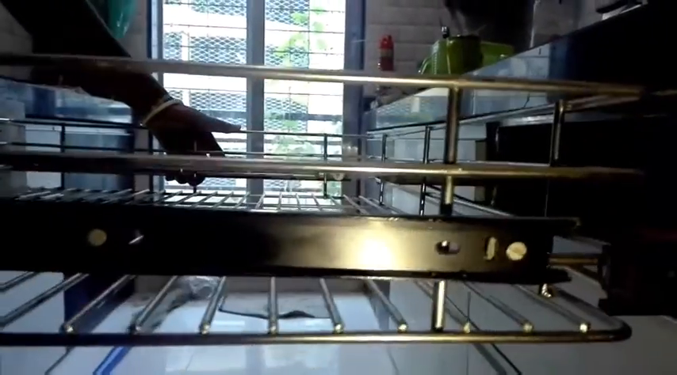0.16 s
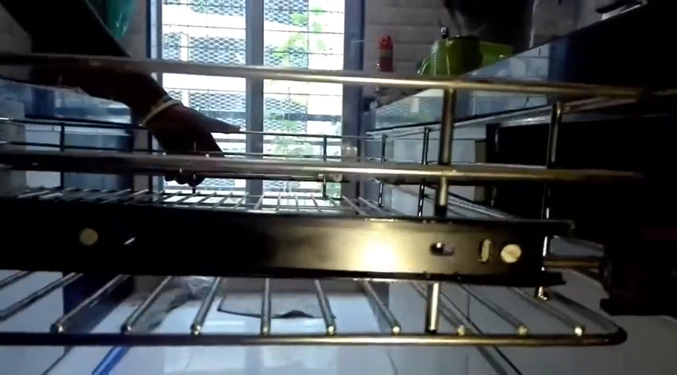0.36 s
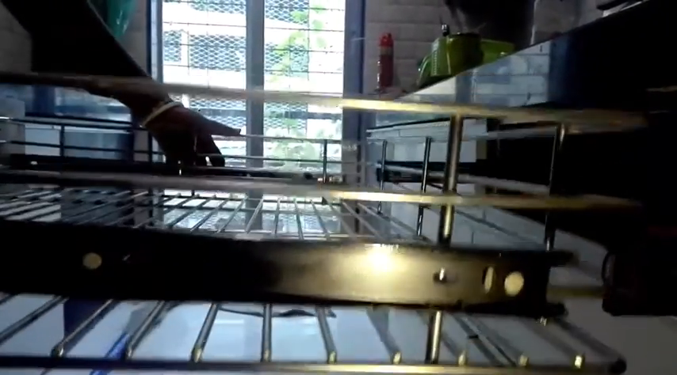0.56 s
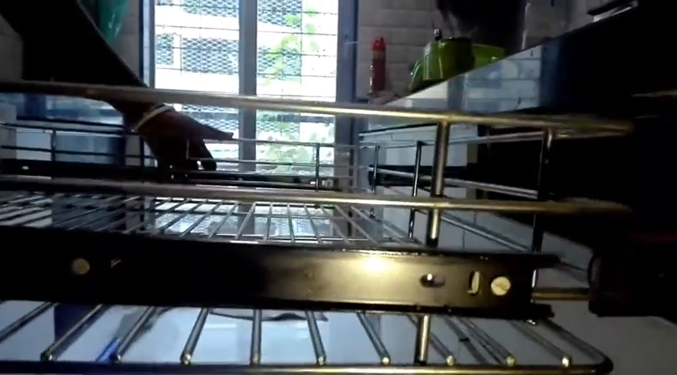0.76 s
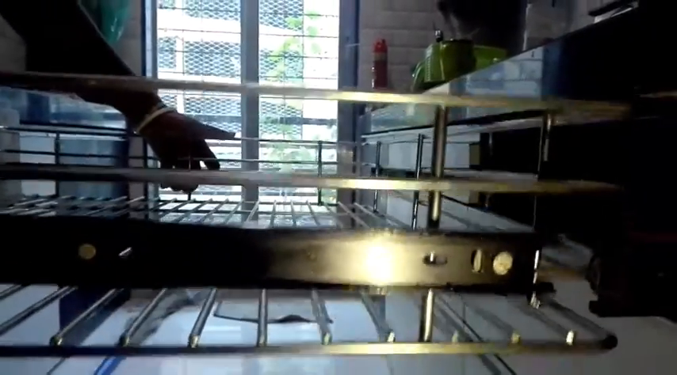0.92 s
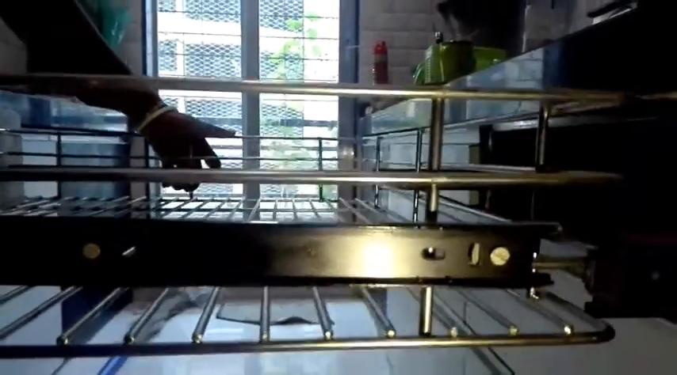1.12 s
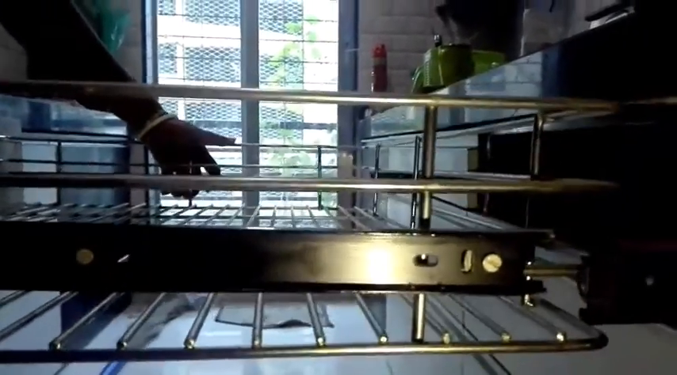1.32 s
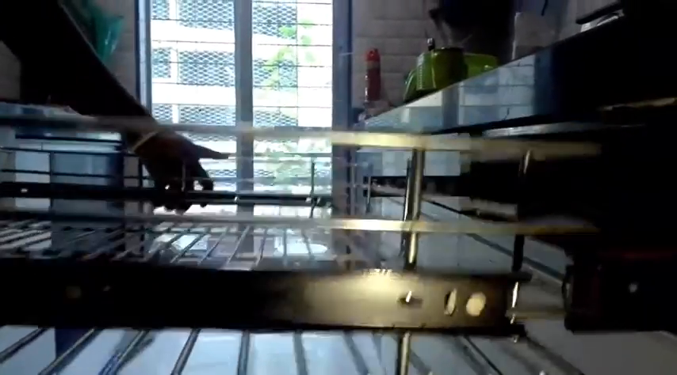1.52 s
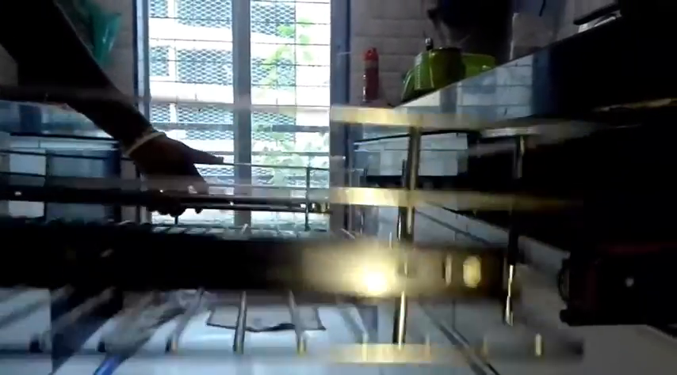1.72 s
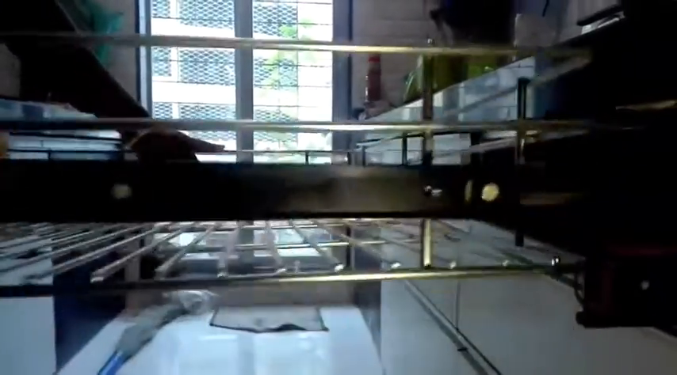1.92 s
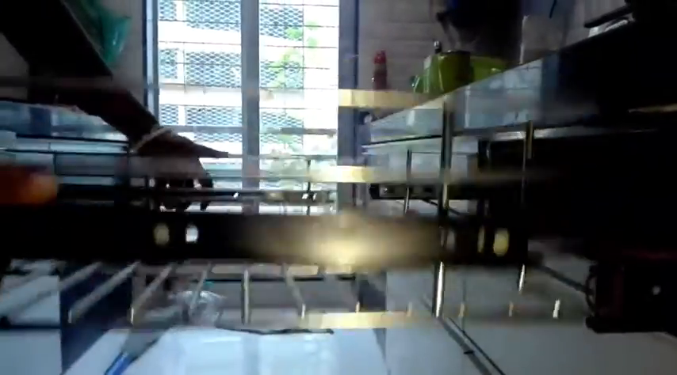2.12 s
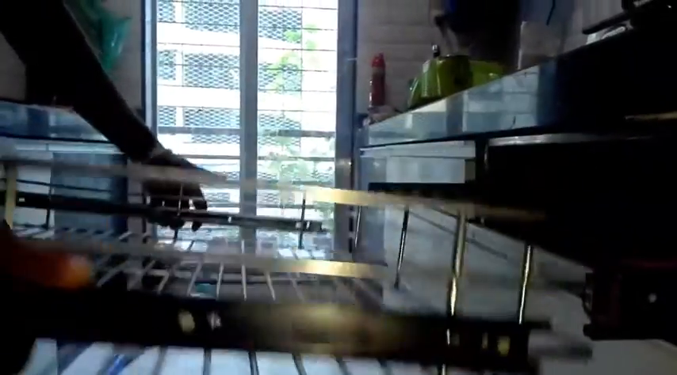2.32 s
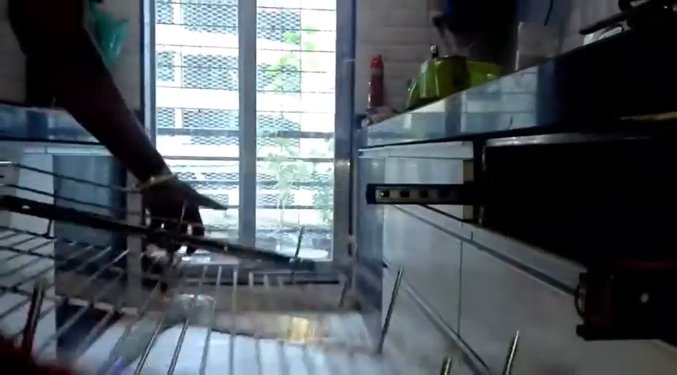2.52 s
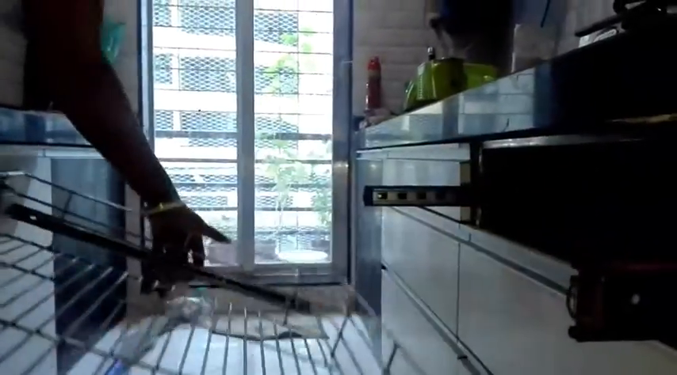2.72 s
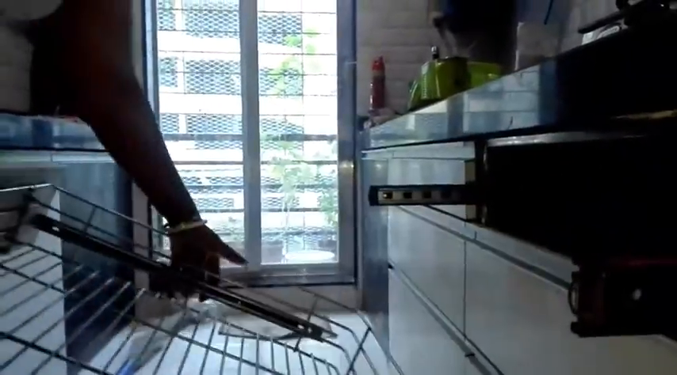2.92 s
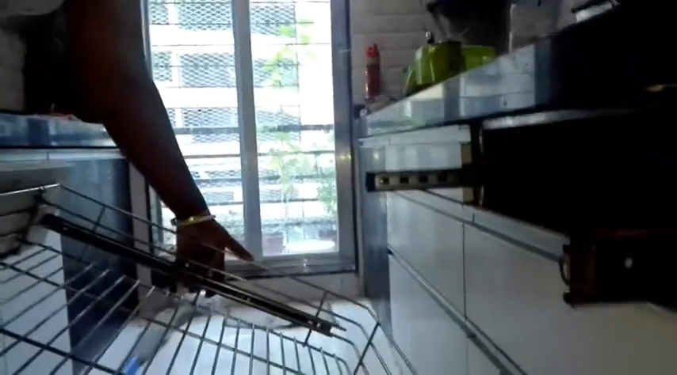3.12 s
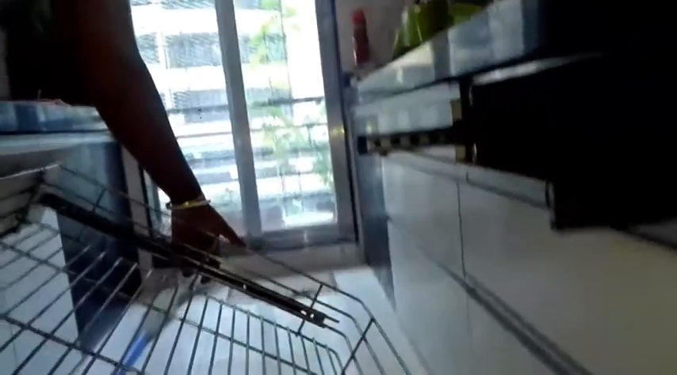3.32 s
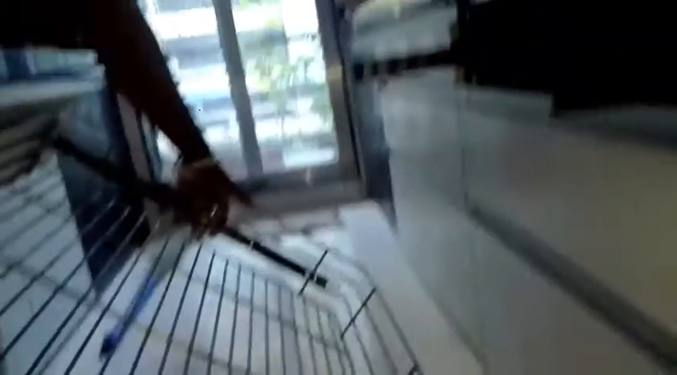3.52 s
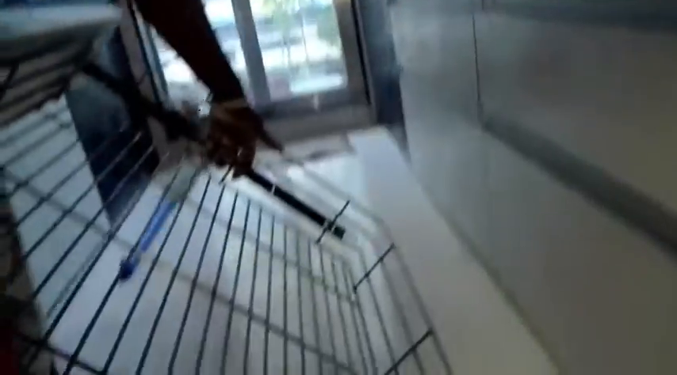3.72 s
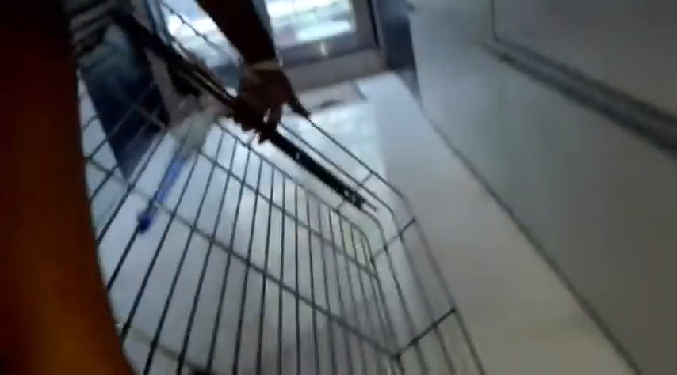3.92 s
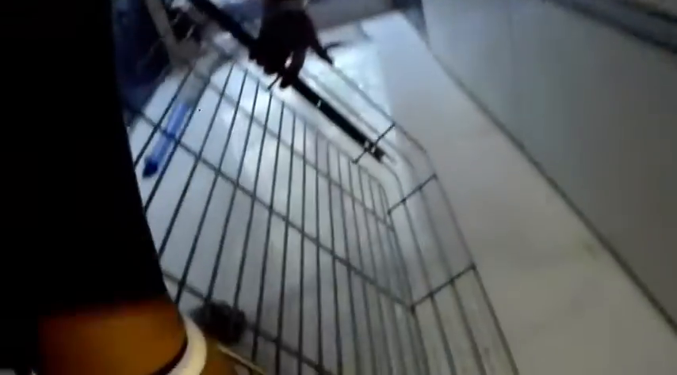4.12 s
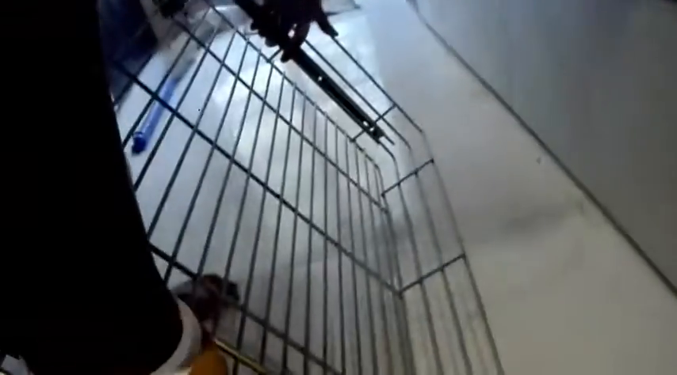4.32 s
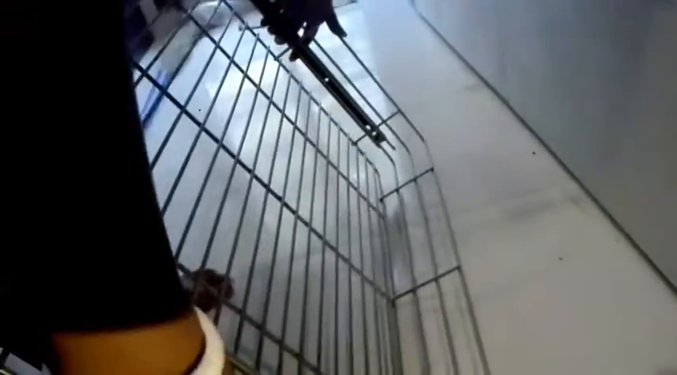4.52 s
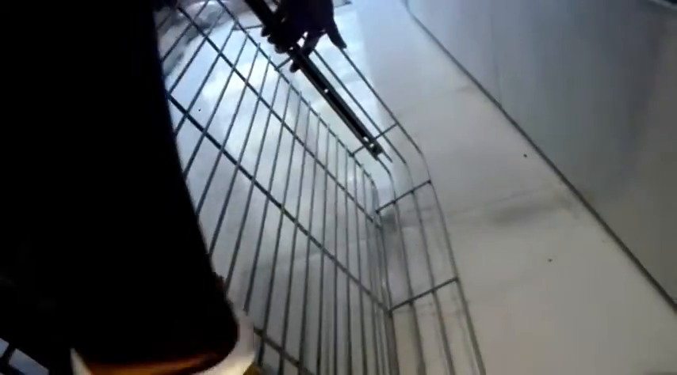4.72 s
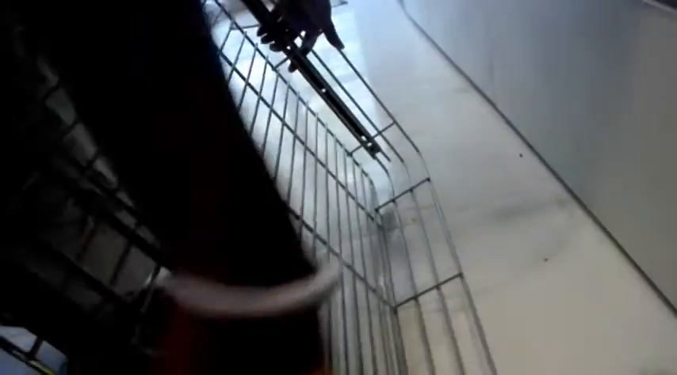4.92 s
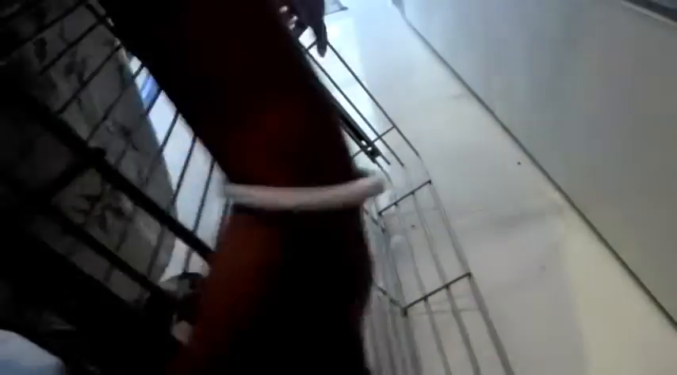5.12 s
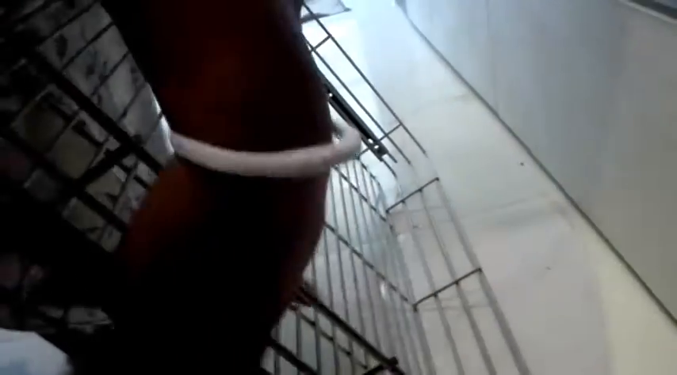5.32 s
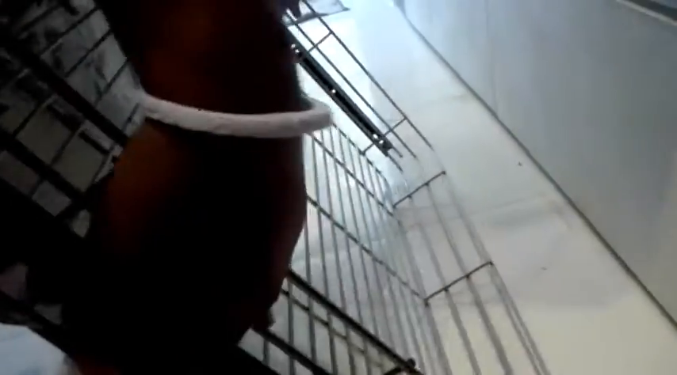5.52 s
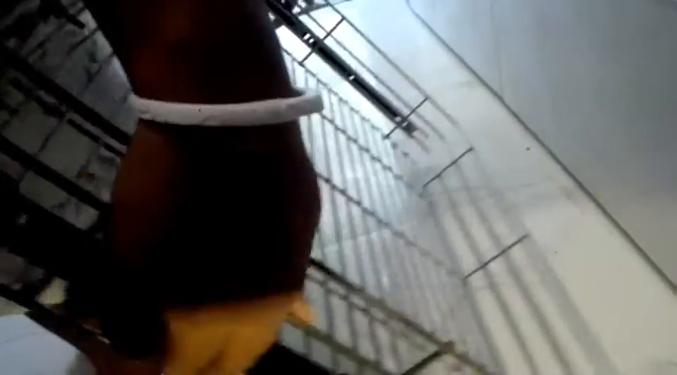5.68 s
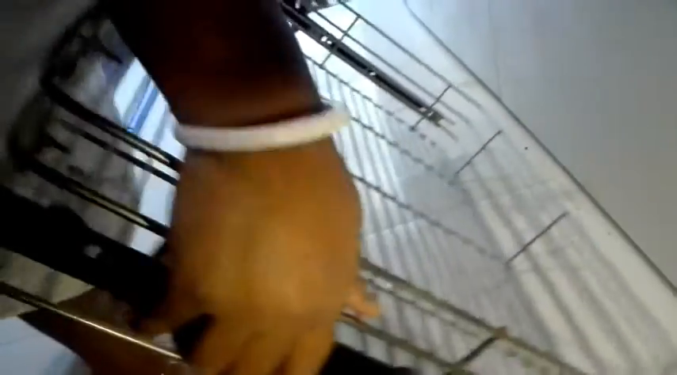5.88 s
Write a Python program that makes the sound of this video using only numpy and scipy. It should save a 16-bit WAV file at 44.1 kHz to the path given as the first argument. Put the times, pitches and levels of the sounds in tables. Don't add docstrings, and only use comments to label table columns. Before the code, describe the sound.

A wire basket is tugged on its drawer slides, snaps free with two loud metallic clanks, lands on tile, then a wire scrapes squeakily.

```python
import sys
import numpy as np
from scipy import signal
from scipy.fft import rfft, irfft
from scipy.io import wavfile
from scipy.ndimage import uniform_filter1d

SR = 44100
rng = np.random.default_rng(int(sys.argv[2]) if len(sys.argv) > 2 else 0)


def undo_db(level):
    steps = np.asarray(level, float) / 20
    return 10 ** steps


def master_out(mix):
    frames = np.transpose(np.atleast_2d(mix))
    ceiling = np.clip(frames, -1, 1)
    pcm = np.round(ceiling * 32767).astype(np.int16)
    wavfile.write(sys.argv[1], SR, pcm)


N = 262395

# pitch_hz, density_db
STREET_COLOUR = [(20, -5.5), (60, 1), (130, -7.5), (200, -10), (320, -11.5), (450, -17.5), (600, -27.5),
                 (800, -20.5), (1300, -11.5), (2100, -16.5), (2550, -26), (3400, -20), (8000, -25.5),
                 (14000, -32)]
# pitch_hz, width_hz, level_db
WINDOW_MODES = [(3540, 710, -36), (5106, 56, -41.5)]
# start_s, frame_db, swell_s, ring_s, runner_db
JOLTS = [(0.0, -36, 0.001, 0.16, -71), (0.36, -50, 0.018, 0.38, -51), (0.71, -41, 0.039, 1, -46),
         (1.09, -28, 0.099, 0.54, -27.5), (1.33, -41.5, 0.066, 0.99, -48.5), (1.66, -25.5, 0.093, 0.6, -28),
         (1.895, -23, .04, 0.63, -30.5), (2.08, -26, 0.02, 0.32, -48), (2.64, -65.5, .08, 1.2, -56),
         (3.692, -45.5, 0.034, 0.48, -65), (3.89, -42.5, 0.024, 0.43, -55), (4.63, -40, 0.036, 0.49, -35),
         (4.818, -22.5, .04, .6, -27), (5.079, -33, 0.036, 0.53, -55), (5.3, -41.5, 0.058, 0.73, -55),
         (5.53, -55, 0.016, 0.91, -66)]
# pitch_hz, width_hz, level_db
FRAME_MODES = [(69, 20, -11.5), (90, 20, 0.5), (124.9, 24, -1), (153, 13, -8.5), (193, 43.5, -14),
               (44, 22, -13)]
# start_s, level_db, length_s
HISS_BURSTS = [(0, -71, 0.042), (0.146, -75, 0.029), (0.276, -81, 0.0082), (2.588, -81, 0.063),
               (2.749, -79.5, .1), (2.884, -73, 0.056), (3.251, -76.5, 0.042), (3.676, -73.5, 0.13),
               (4.059, -73.5, 0.086), (4.387, -74, 0.032), (5.262, -70, 0.25), (5.543, -75, 0.061),
               (5.69, -75, 0.044)]
# start_s, level_db, pitch_hz, ring_s, contact_s
TOUCHES = [(.0712, -61, 1530, 0.05, 0.0077), (2.585, -47.5, 1760, 0.024, 0.033),
           (2.585, -54.5, 2650, .03, 0.013), (3.3752, -47, 2016, 0.049, 0.03),
           (3.3752, -48.5, 1696, 0.026, 0.035), (3.3752, -54.5, 1345, 0.091, 0.036),
           (3.52, -54, 1650, 0.044, 0.029), (3.9471, -55, 3010, 0.021, 0.015),
           (4.07, -56.5, 2100, 0.082, 0.13), (2.05, -44.5, 1308, 0.16, 0.096),
           (2.201, -54, 1150, 0.16, 0.065), (1.113, -49, 964, 0.11, 0.035), (4.641, -35.5, 3527, .1, .015),
           (4.65, -41, 1380, 0.26, 0.079), (4.66, -41, 1610, 0.18, .08), (4.843, -28.5, 3300, .08, 0.032),
           (1.899, -20, 6210, .04, .006), (1.897, -22.5, 4780, .05, .006), (2.03, -48.5, 3230, 0.21, 0.079)]

# start_s, level_db, spread_s, ring_s
TUGS = [
    (0.684, -51, 0.0014, 0.1),
    (0.7022, -47.5, 0.00093, 0.3),
    (1.1086, -43.5, 0.0012, 0.28),
]
SNAP = [
    (1.655, -27.5, 0.0045, 0.13),
    (1.6617, -15.5, 0.0089, 0.21),
]
SETTLE = [
    (1.76, -35.5, 0.014, 0.43),
    (1.8311, -35, 0.0033, 0.16),
]
RELEASE = [
    (1.882, -27, 0.0082, 0.3),
    (1.8983, -17.5, 0.0038, 0.21),
    (1.9236, -17.5, 0.0025, 0.2),
    (1.975, -32.5, 0.0074, 0.388),
]
LANDING = [
    (4.6397, -33, 0.0017, 0.46),
    (4.842, -22, 0.0004, 0.51),
    (4.93, -34, 0.0024, 0.45),
    (4.984, -32.5, 0.002, 0.2),
    (5.118, -53.5, 0.017, 0.5),
]
PING = [
    (4.817, -35, 0.00064, 0.2),
]
# pitch_hz, density_db
TUG_COLOUR = [(150, -38), (250, 6), (723, -7), (935, 3), (1070, -14.5), (1650, 2.5), (2660, -41.5),
              (6590, -5.5), (13300, 0), (15000, -32)]
SNAP_COLOUR = [(200, -30), (300, -9), (550, -21), (1000, -0.5), (1500, 1), (3000, 0.5), (4500, -4.5),
               (6000, -0.5), (10000, -4.5), (14500, -17)]
SETTLE_COLOUR = [(300, -20), (600, -24.5), (1400, 3.5), (3000, -3), (4500, -14), (6000, -2), (10000, -6),
                 (11500, -30)]
RELEASE_COLOUR = [(200, -31), (400, -18), (600, -31.5), (850, -20), (1100, -9), (2000, -2), (3200, 0),
                  (4300, -5), (6000, -1.5), (9000, -3), (14500, -4.5)]
LANDING_COLOUR = [(200, -31.5), (400, -12), (600, -14), (1000, -9.5), (1400, 3.5), (1800, 5), (2600, -2.5),
                  (3500, 0.5), (5000, -5.5), (10000, -8), (14500, -23)]
PING_COLOUR = [(250, -43), (3000, -37), (6000, -21.5), (9000, -8), (12000, 5), (14500, -24)]
# pitch_hz, width_hz, level_db
TUG_RODS = [(952, 35, -15.5), (3900, 65, -26), (5380, 31, -28), (5550, 26, -16), (6400, 41, -7),
            (6700, 150, 3), (7220, 90, -6.5), (9100, 370, -11), (10300, 170, -7), (11060, 60, -8.5),
            (13260, 150, -21)]
SNAP_RODS = [(271, 15, -6.5), (403, 27, -2), (953, 60, -8), (1200, 47, -4.5), (1510, 120, -2.5),
             (3040, 210, -5), (5150, 300, -4.5)]
RELEASE_RODS = [(260, 25, -9), (402, 31, -1.5), (964, 95, -8), (1403, 120, -1.5), (1764, 54, -4.5),
                (3374, 700, -1), (4960, 90, -6.5), (6200, 300, -2)]
LANDING_RODS = [(1350, 140, -3), (1804, 12, -2.5), (2100, 7.8, -4.5), (3620, 180, -12), (7000, 270, -8.5)]
PING_RODS = [(3970, 120, -14), (7250, 80, -10), (8800, 60, 1.5), (10300, 57, 5), (12000, 150, -12)]
SCRAPE_RODS = [(1980, 55, -28), (3577, 34, 21), (3540, 82, 12), (2870, 150, -39)]
# start_s, level_db, pitch_hz
TICKS = [
    (0.7035, -33.5, 6600),
    (1.1089, -20, 6560),
    (1.6554, -22, 5500),
    (1.6612, -4.5, 7000),
    (1.8993, -6.5, 5630),
    (1.9217, -4.5, 3890),
    (4.817, -48, 9670),
    (4.84, -22, 6920),
]
# time_s, pressure_db
PRESSURE = [
    (5.7, -28),
    (5.752, -22),
    (5.772, -13),
    (5.81, -16.5),
    (5.83, -7),
    (5.865, -3.5),
    (5.92, 0.5),
    (5.93, -5.5),
    (5.95, -4),
]
# pitch_hz, level_db
STEREO_WIDTH = [(30, -11), (100, -20), (500, -12.5), (1500, -14.5), (4000, -13), (8000, -5), (11000, -5.5),
                (14000, -4.5)]
# pitch_hz, threshold_db
GATE = [(100, -9), (400, -1), (600, -4.5), (1000, -4.5), (2500, -2), (6000, -2.5), (8500, -0.6),
        (10000, 0.8), (14000, 5.5)]
MESH_HZ = 250 * 2 ** np.arange(0, 6.1, 0.5)


def unit(x):
    return x / np.sqrt(np.mean(x ** 2))


def shape(x, table):
    hz, db = np.transpose(table)
    f = np.fft.rfftfreq(x.shape[-1], 1 / SR) + 1
    gain = undo_db(np.interp(np.log(f), np.log(hz), db))
    return irfft(rfft(x) * gain, x.shape[-1])


def ring(x, hz, width_hz):
    r = np.exp(-np.pi * width_hz / SR)
    angle = 2 * np.pi * hz / SR
    gain = np.sqrt(2 - 2 * r * r) * np.sin(angle)
    return signal.lfilter([gain], [1, -2 * r * np.cos(angle), r * r], x)


def ring_all(x, modes):
    return sum(undo_db(db) * ring(x, hz, width_hz) for hz, width_hz, db in modes)


def band(x, hz, span):
    edges_hz = [hz / span, min(hz * span, 20000)]
    return signal.sosfilt(signal.butter(2, edges_hz, "band", fs=SR, output="sos"), x)


def decay(t, t60_s):
    return np.exp(-np.log(1000) * t / t60_s)


def walk(rate_hz):
    k = int(SR / rate_hz)
    steps = np.repeat(rng.standard_normal(N // k + 1), k)
    return 2.13 * uniform_filter1d(uniform_filter1d(steps, k), k)[:N]


def grit(size, rough_db):
    strength_db = rough_db * np.repeat(rng.exponential(size=size // 16 + 1), 16)[:size]
    return unit(rng.standard_normal(size) * undo_db(strength_db))


def street():
    air = rng.standard_normal(N)
    wash = unit(shape(air, STREET_COLOUR) + ring_all(air, WINDOW_MODES))
    return wash * undo_db(-58.5 + walk(11) / 2)


def sway(column, rest_db):
    t, power = np.arange(N) / SR, undo_db(2 * rest_db)
    for row in JOLTS:
        start_s, swell_s, ring_s = row[0], row[2], row[3]
        age = np.maximum(t - start_s, 0)
        gain = undo_db(row[column]) * (1 - np.exp(-age / swell_s)) ** 2 * decay(age, ring_s)
        power = power + gain ** 2
    return np.sqrt(power)


def shudder():
    push, rub = rng.standard_normal((2, N))
    modes = [undo_db(db) * ring(push, hz, width_hz) for hz, width_hz, db in FRAME_MODES]
    frame = unit(sum((-1) ** k * mode for k, mode in enumerate(modes)))
    runner = unit(ring(rub, 154.3, width_hz=9))
    return frame * sway(column=1, rest_db=-61.5) + runner * sway(column=4, rest_db=-71.5)


def top_hiss():
    bursts, t = np.zeros(N + SR), np.arange(SR // 2) / SR
    for start_s, db, length_s in HISS_BURSTS:
        i = int(start_s * SR)
        bursts[i:i + len(t)] += undo_db(db) * np.exp(-(t / length_s) ** 3)
    hiss = unit(band(rng.standard_normal(N), 10000, span=1.4))
    return hiss * bursts[:N] * undo_db(3 + 2.5 * walk(15))


def touches():
    out, t = np.zeros(N + SR), np.arange(SR // 2) / SR
    for start_s, db, hz, ring_s, contact_s in TOUCHES:
        rub = rng.standard_normal(len(t)) * np.exp(-t / contact_s)
        rung = ring(rub, hz, np.log(1000) / np.pi / ring_s)
        i = int(start_s * SR)
        out[i:i + len(t)] += undo_db(db) * rung / np.abs(rung).max()
    return out[:N]


def mesh_chatter():
    size = 2 * SR
    return np.array([band(grit(size, rough_db=1.5), hz, span=2 ** 0.25) * undo_db(2 * walk(60)[:size])
                     for hz in MESH_HZ])


def blows(mesh, table, colour, rods, rods_db, late=0.48, dull=0.29):
    out, t = np.zeros(N + SR), np.arange(SR * 2 // 5) / SR
    pitch = MESH_HZ[:, None] / 4000
    fade = np.minimum(1, 10 * (t[-1] - t))
    for start_s, db, spread_s, ring_s in table:
        rise = 1 - np.exp(-t / (spread_s * pitch ** -late + 1e-4))
        fall = decay(t, ring_s * pitch ** -dull)
        cut = rng.integers(mesh.shape[1] - len(t))
        drive = np.sum(mesh[:, cut:cut + len(t)] * rise ** 2 * fall, axis=0)
        rattle = shape(drive, colour) + undo_db(rods_db) * ring_all(drive, rods)
        i = int(start_s * SR)
        out[i:i + len(t)] += fade * undo_db(db) * rattle
    return out[:N]


def ticks():
    out, t = np.zeros(N), np.arange(SR // 20) / SR
    for start_s, db, hz in TICKS:
        i = int(start_s * SR)
        crack = band(rng.standard_normal(len(t)), hz, span=1.45) * np.exp(-t / 0.0016)
        out[i:i + len(t)] += undo_db(db) * crack
    return out


def scrape():
    time_s, pressure_db = np.transpose(PRESSURE)
    press_db = np.interp(np.arange(N) / SR, time_s, pressure_db, left=-120)
    capped_db = np.minimum(press_db, -1.5)
    slips = grit(N, rough_db=1.0) * undo_db(0.64 * walk(90))
    squeak = unit(ring_all(slips, SCRAPE_RODS))
    hiss = unit(band(slips, 9300, span=1.35) + undo_db(-6.0) * ring(slips, 5420, width_hz=400))
    rail_hz = 395 * (1 + 0.01 * walk(40))
    rail = np.sqrt(2) * np.sin(2 * np.pi * np.cumsum(rail_hz) / SR) * undo_db(2.0 * walk(30))
    out = squeak * undo_db(-43.5 + press_db)
    out += hiss * undo_db(-41.5 + 2.5 * (capped_db + 1.5))
    return out + rail * undo_db(-51.5 + 1.44 * capped_db)


def kitchen(x):
    t = np.arange(SR // 2) / SR
    tail = rng.standard_normal(len(t)) * decay(t, t60_s=0.63) * (1 - np.exp(-t / 0.0014))
    tail = tail * np.exp(-t / 0.015) + band(tail, 800, span=1.5) * (1 - np.exp(-t / 0.08))
    return signal.fftconvolve(x, tail / np.sqrt(np.sum(tail ** 2)))[:N]


def sounds(mesh):
    basket = touches() + ticks() + scrape()
    basket += blows(mesh, TUGS, TUG_COLOUR, TUG_RODS, rods_db=-4.5)
    basket += blows(mesh, SNAP, SNAP_COLOUR, SNAP_RODS, rods_db=-16.5)
    basket += blows(mesh, SETTLE, SETTLE_COLOUR, SNAP_RODS, rods_db=-10.5)
    basket += blows(mesh, RELEASE, RELEASE_COLOUR, RELEASE_RODS, rods_db=-17.5, dull=0.33)
    basket += blows(mesh, LANDING, LANDING_COLOUR, LANDING_RODS, rods_db=-14.0)
    basket += blows(mesh, PING, PING_COLOUR, PING_RODS, rods_db=2.0)
    return street() + undo_db(-2.0) * shudder() + top_hiss() + basket + undo_db(-10) * kitchen(basket)


def scene():
    mesh = mesh_chatter()
    mid = sounds(mesh)
    side = shape(sounds(mesh), STEREO_WIDTH)
    return np.array([mid + side, mid - side])


def gate(x):
    f, _, z = signal.stft(x, SR, nperseg=2048)
    edges = np.unique(np.r_[np.geomspace(4, 400, 30), np.arange(400, 700, 32)].astype(int))
    band_hz = f[edges[:-1]]
    power = np.array([np.mean(abs(z[:, a:b]) ** 2, axis=(0, 1)) for a, b in zip(edges, edges[1:])])
    power = uniform_filter1d(power, size=2) + 1e-30
    hz, db = np.transpose(GATE)
    usual = np.median(power, axis=1) * undo_db(2 * np.interp(band_hz, hz, db))
    mask_db = -27
    loudest = power[band_hz > 1000].max(axis=0) * undo_db(2 * mask_db)
    waver = undo_db(2.6 * uniform_filter1d(rng.standard_normal(power.shape), size=3))
    bar = waver * np.maximum(usual[:, None], loudest)
    passed = 1 / (1 + (bar / power) ** 12)
    rows = np.r_[np.ones((1, len(loudest))), passed, passed[-1:]]
    gain = np.repeat(rows, np.diff(np.r_[0, edges, len(f)]), axis=0)
    return signal.istft(z * gain, SR, nperseg=2048)[1][:, :N]


def low_pass(x):
    return signal.sosfilt(signal.butter(12, 15380, fs=SR, output="sos"), x)


def record(dry):
    top_cut = signal.ellip(8, 0.2, 60, 14600, fs=SR, output="sos")
    mix = gate(signal.sosfilt(top_cut, dry))
    return low_pass(mix)


dry = scene()
out = record(dry)
master_out(out)
```